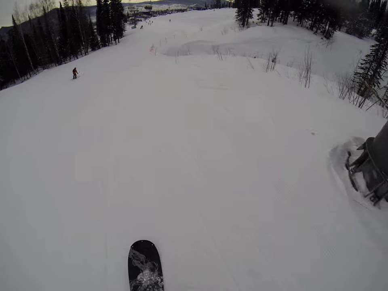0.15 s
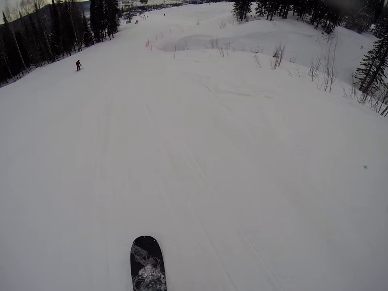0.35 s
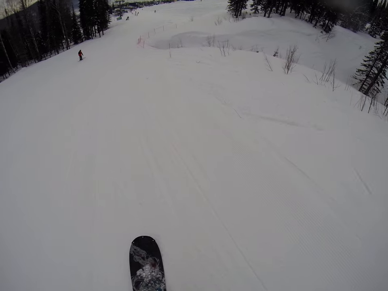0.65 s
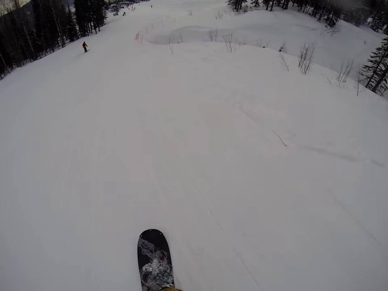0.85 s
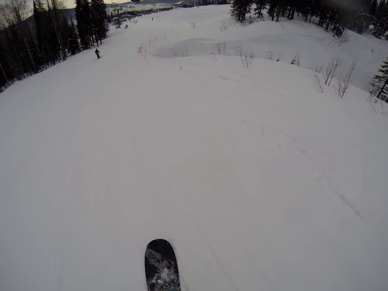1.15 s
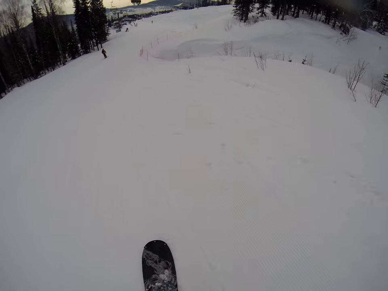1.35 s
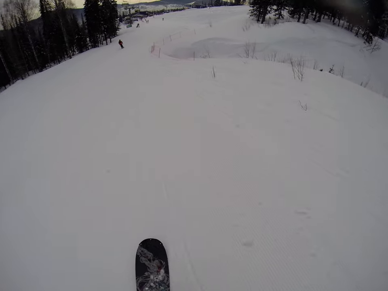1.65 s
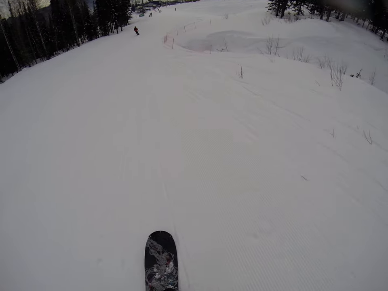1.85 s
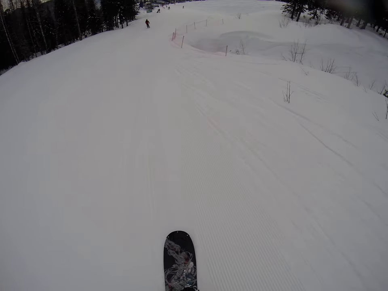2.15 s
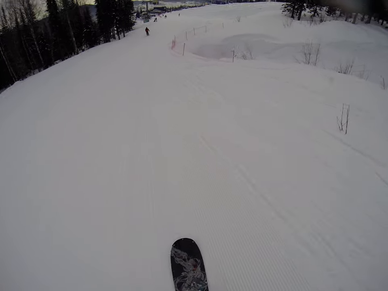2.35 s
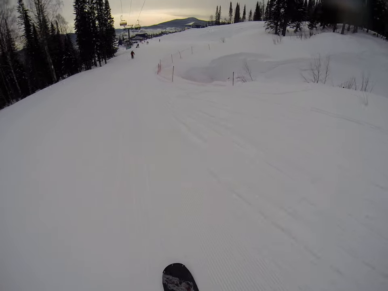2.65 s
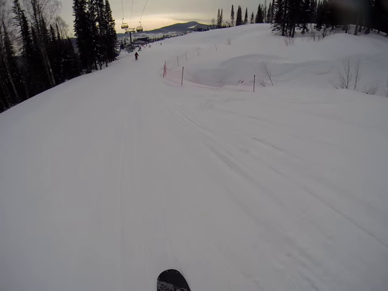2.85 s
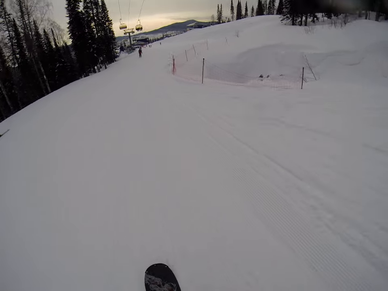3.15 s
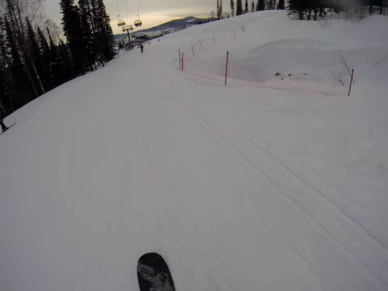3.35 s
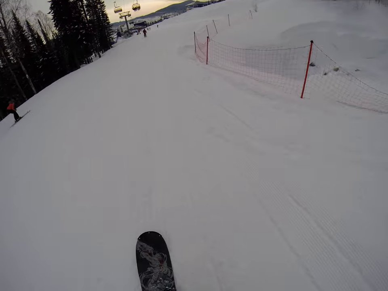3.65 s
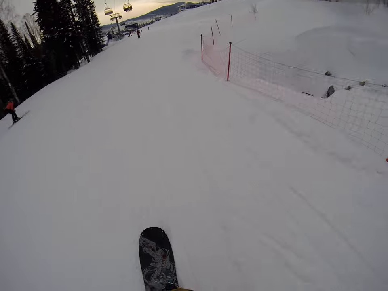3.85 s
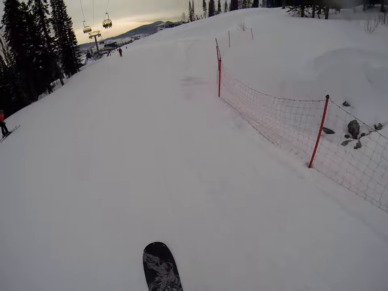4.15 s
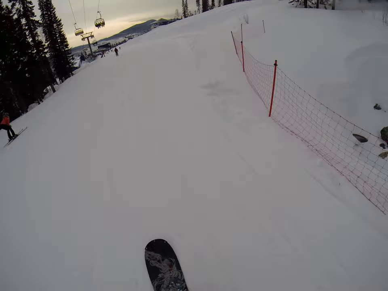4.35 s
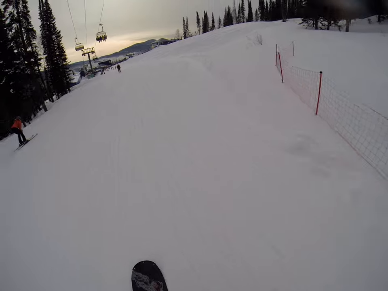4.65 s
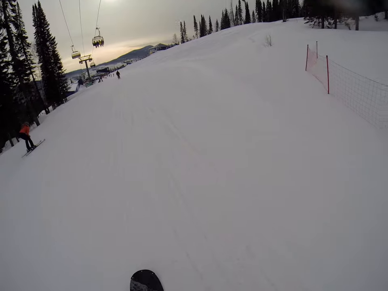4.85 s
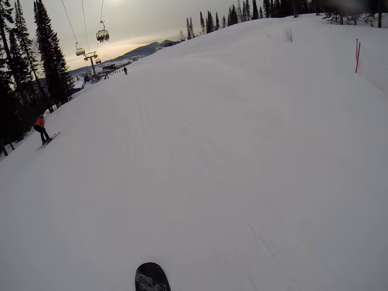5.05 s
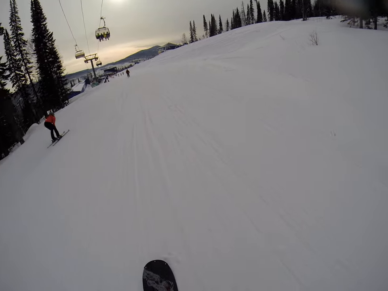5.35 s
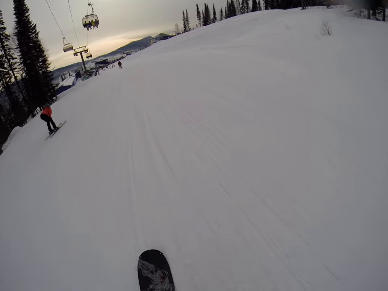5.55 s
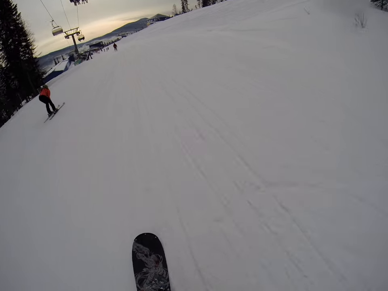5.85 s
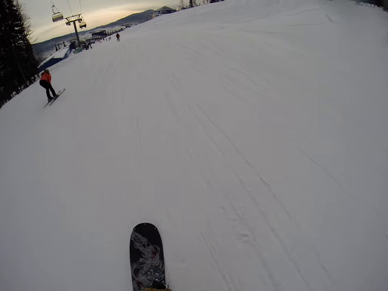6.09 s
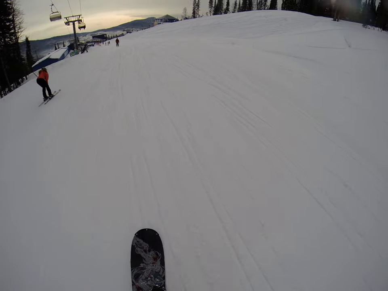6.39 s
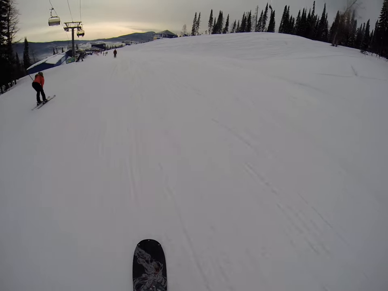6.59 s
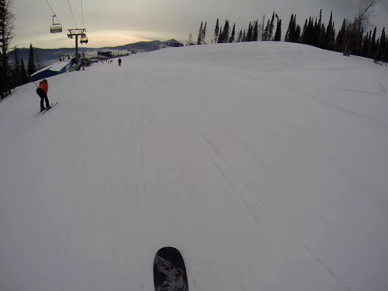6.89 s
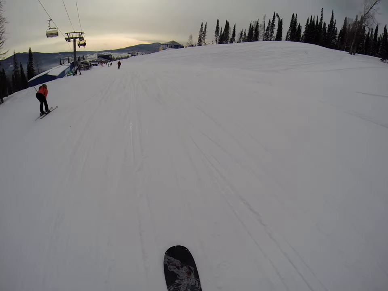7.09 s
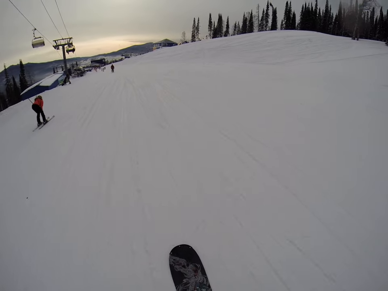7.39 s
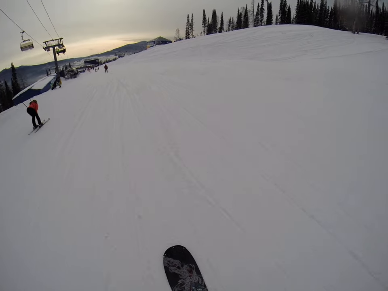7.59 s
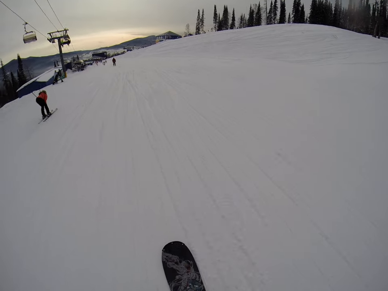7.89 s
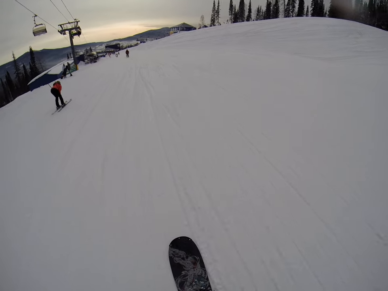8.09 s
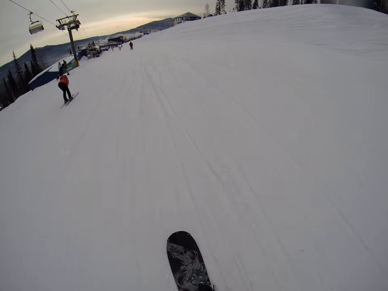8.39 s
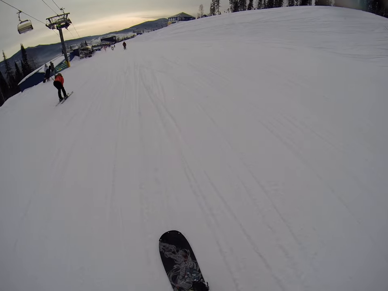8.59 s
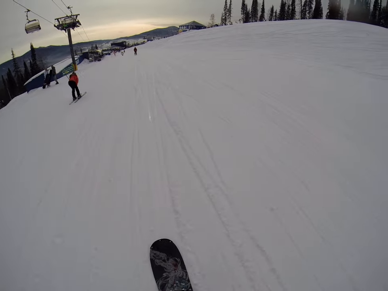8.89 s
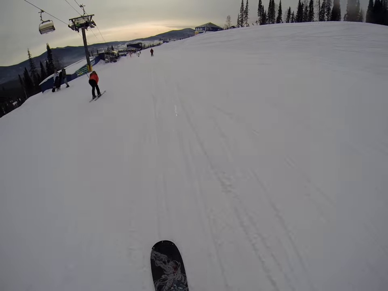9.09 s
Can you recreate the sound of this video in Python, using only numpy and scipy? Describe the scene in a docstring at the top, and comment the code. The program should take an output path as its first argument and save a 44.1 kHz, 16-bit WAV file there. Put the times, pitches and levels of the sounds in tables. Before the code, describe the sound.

A snowboard scrapes over groomed snow, faint at first, then loud with hollow knocks and rattles on the camera mount, finally thinning to soft hiss.

```python
"""A snowboard on groomed snow, heard from within: the microphone rides in a camera's closed, sprung housing.
At first a faint scrape, filtered noise coloured by the housing, with small squeaks and puffs of spray.
From 2.6 s it is loud; until 5.7 s bumps knock the mount's decaying modes into ringing, with loose rattles.
The scrape then dips, returns near 6.8 s and thins out from 7.9 s, with three last bumps after 8.4 s.
Throughout, random jolts shake the mount, shaped noise makes the air rush, and electronics hiss and whine."""
import sys
import numpy as np
from scipy import signal
from scipy.io import wavfile
from scipy.ndimage import uniform_filter1d

SR = 44100
rng = np.random.default_rng(int(sys.argv[2]) if len(sys.argv) > 2 else 0)


def output_pcm(signal):
    """Save a mono or channel-first signal as 16-bit PCM at the path in sys.argv[1].

    Samples are clipped to [-1, 1] before scaling.
    """
    pcm = np.clip(np.atleast_2d(signal).T, -1, 1) * 32767
    wavfile.write(sys.argv[1], SR, np.round(pcm).astype(np.int16))


N = 407043
FRAME, HOP = 1024, 256  # short-time spectra [samples]

# scrape of the board before flutter and grit: (time [s], level [dB])
SCRAPE_LEVEL = [(0, -52.5), (.45, -51.5), (.9, -45.5), (1.16, -50.5), (1.54, -38.5), (1.97, -44.5),
                (2.66, -33.5), (2.84, -28.5), (3.3, -29), (3.76, -34.5), (4.2, -35.5), (4.65, -33.5),
                (5.05, -30), (5.28, -31), (5.5, -31), (5.7, -32), (5.9, -37.5), (6.27, -42.5),
                (6.81, -35.5), (7.55, -35), (7.66, -34), (7.88, -39.5), (8.32, -43), (8.52, -50.5),
                (8.8, -45.5), (9.23, -44.5)]
# spectrum of crumbling snow: (frequency [Hz], relative level [dB per Hz])
SNOW_SPECTRUM = [(500, -34.5), (900, -18), (1200, -14), (2000, -13.5), (3300, -10), (3750, -9), (4000, -22),
                 (6000, -26.5), (7000, -34), (7900, -48), (8400, -47.5), (11000, -53.5), (12800, -57),
                 (14500, -77)]
# peaks and dips of the housing around the microphone: (frequency [Hz], width [Hz], gain [dB])
HOUSING_RESONANCES = [(1600, 278, 10.5), (2335, 730, 3), (2580, 86, -11.5), (2865, 450, 5),
                      (3802, 210, -8.5), (4870, 540, -8), (5700, 350, 2.5)]
# lowest housing peak, sliding as the camera turns: (time [s], frequency [Hz])
LOW_PEAK_PATH = [(0, 1379), (5.7, 1361), (6.3, 1297), (7.2, 1355), (9.23, 1303)]
LOW_PEAK_WIDTH_HZ, LOW_PEAK_DB = 258, 12.5
# tone balance: (time [s], scrape's lower mids [dB], scrape's treble at 4.3 kHz [dB],
# scrape's upper spray edge [dB], air's mids [dB])
TONE_BALANCE = [(0, 0.5, 7.5, -3, -2), (.7, 1, 6.5, -8, -4), (1.1, 1, 1, -6, -2.5), (1.5, -1.5, -2, -3, -2),
                (2.0, 1, 0.5, -4, -0.5), (2.4, 0.8, -0.5, -1, -6), (3.1, 0.5, 1.5, 6, -4),
                (3.7, -2.5, 2.5, -1, 4.5), (4.3, -1.5, 5, 7, 4.5), (5.05, -3, 3.5, 5.5, 4.5),
                (5.5, -1, 1.1, 0, 0.5), (5.9, -1.2, 3.5, 1, 3.5), (7.2, 1.1, -1, -2, -4),
                (7.75, -2, 2, -1, 3), (8.2, 0.9, 0.7, -3, 0.5), (8.7, -0.5, -4, -4, 0.5),
                (9.23, 3.5, -1.5, -4, -4)]
# swishes of loose snow: (time [s], length [s], level [dB])
SWISH_EVENTS = [(1.27, 0.12, -52.5), (1.5, 0.29, -55), (1.737, 0.22, -48.5), (6.7, 0.22, -51),
                (8.814, 0.17, -53)]
# spectrum of loose snow: (frequency [Hz], relative level [dB per Hz])
POWDER_SPECTRUM = [(3500, 8), (4300, 9.5), (5200, 0), (6500, 5), (7200, -19), (9500, -12), (12500, -30)]
# fuzzy squeaks of the edge: (time [s], length [s], start pitch [Hz], end pitch [Hz], level before throb [dB])
SQUEAK_EVENTS = [(1.31, 0.22, 1155, 1120, -49.5), (1.505, 0.2, 1550, 1600, -44),
                 (2.835, 0.11, 1375, 1450, -27.5), (3.515, 0.12, 1690, 1636, -35),
                 (3.853, 0.079, 1606, 1570, -31.5), (3.915, 0.038, 1455, 1392, -32.5),
                 (6.36, 0.203, 1164, 1217, -46.5), (6.551, 0.072, 1277, 1244, -37.5),
                 (6.818, 0.052, 1575, 1630, -38.5)]
# modes of the mount: (frequency [Hz], level when knocked [dB], level when shaken [dB], free t60 [s]); # the
# first is the sway; the second swings with both sway and knock in a bump
MOUNT_MODES = [(29.14, 5.5, 0.5, 0.35), (87.3, -12, -8.5, 0.8), (132, 6.5, -7.5, 0.025),
               (235.8, 1, -1, 0.16), (350, -29, -17.5, 0.093), (510.6, -18.5, -13.5, 0.14),
               (667.5, -26, -14, 0.12)]
# bumps: (time [s], knock [dB], sway [dB], dull thud against the knock [dB], share of the free ring time [ratio])
BUMP_EVENTS = [(2.62, -32.5, -36, 2, 0.38), (2.675, -28, -25, 7.5, 0.51), (2.795, -17.5, -14.5, -14, 0.56),
               (3.292, -22.5, -22, -20.5, 0.77), (3.457, -34, -11, -14, 0.54), (3.478, -12.5, -16, 1, 0.9),
               (3.517, -22.5, -29.5, -26, 0.94), (3.828, -23.5, -25, -16, 0.81),
               (3.869, -19, -14, -3, 0.31), (3.908, -5, -14, -7, 0.71), (4.287, -24.5, -41, -14, 0.52),
               (4.736, -24.5, -43, -17, 0.66), (4.746, -22.5, -23, -8, 0.6), (4.811, -21.5, -35, 0, 0.25),
               (4.951, -25, -15.5, -1, 0.55), (5.031, -27, -45, -1, 0.41), (5.064, -15.5, -16.5, -1, 0.75),
               (5.335, -19.5, -45, -3, 0.27), (5.427, -24, -47, -6, 0.3), (5.458, -24, -21, 4, 0.3),
               (5.591, -24, -26, -11, 0.39), (5.645, -26, -15, -3, 0.53), (5.665, -24.5, -60, 13, 0.43),
               (5.702, -24, -23.5, 3, 0.6), (8.455, -28.5, -52, -15, 0.89), (8.862, -31.5, -32, -7, 0.36),
               (8.981, -38.5, -24, -11, 0.62)]
RISE_MS, RISE_MS_PER_DB = 10.2, 0.5  # rise time constant [ms], and its change with thud [ms per dB]
CRACK_DB, CRACK_HZ, CRACK_T60 = -37.5, 600, 0.067  # crunch: base level [dB], low-pass [Hz], decay [s]
# stretches where the mount rattles loosely: (time [s], length [s], level [dB])
RATTLE_STRETCHES = [(3.383, 0.11, -31), (3.825, 0.078, -27), (4.72, 0.18, -39), (4.908, 0.12, -37),
                    (5.582, .05, -31.5)]
RATTLE_PER_S, RATTLE_SHARE = 140, 0.3  # mean jolts [per s]; share of the free ring time
# ice grains on the housing: (time [s], starting level [dB])
TICK_EVENTS = [(2.6733, -38), (4.9222, -44), (5.0494, -47)]
# ride: (time [s], slow sway of the mount [dB], fine shaking [dB], rush of air [dB])
RIDE_LEVELS = [(0, -41.5, -62, -53.5), (.6, -43, -58.5, -50.5), (1.05, -43.5, -52.5, -51),
               (2.1, -43.5, -50, -50), (3.1, -37, -42.5, -51.5), (3.6, -39.5, -42.5, -49),
               (4.1, -31.5, -44.5, -47), (4.6, -42, -45, -47.5), (5.15, -35, -44.5, -49),
               (5.7, -45, -45.5, -49.5), (6.2, -43, -45.5, -50), (6.7, -42.5, -47, -48),
               (7.7, -38, -48.5, -54), (8.2, -39.5, -57, -51), (9.23, -38.5, -54, -55.5)]
# spectrum of the air rush: (frequency [Hz], relative level [dB per Hz])
RUSH_SPECTRUM = [(40, 7), (100, 5), (300, 3), (450, -1), (700, -2.5), (1000, -2.5), (2000, -30),
                 (5000, -44)]
# spectrum of the electronic hiss: (frequency [Hz], relative level [dB per Hz])
HISS_SPECTRUM = [(3000, 14), (7000, 4), (9000, -3), (12000, -8.5), (13000, -8), (14300, -13), (15000, -7)]
HISS_DB = -61.5  # mean level
# thin electronic tones: (frequency [Hz], level [dB rms])
WHINE_TONES = [(9469, -88), (11838, -77)]
EDGE_HZ = 15300  # upper band limit of the microphone signal


def gain_of(db):
    """Decibels to gain."""
    return 10 ** (np.asarray(db) / 20)


def evened(x):
    """Scales to rms 1."""
    return x / np.sqrt(np.mean(x ** 2) + 1e-20)


def read(points, hz):
    """Reads a spectrum on a log-frequency axis."""
    f, value = np.transpose(points)
    return np.interp(np.log(hz + 1), np.log(f + 1), value)


def follow(rows, t):
    """Reads every column of a curve at the times t."""
    s, *columns = np.transpose(rows)
    return [np.interp(t, s, c) for c in columns]


def grid():
    """Frequencies (a column) and times of the short-time spectra."""
    hz = np.fft.rfftfreq(FRAME, 1 / SR)[:, None]
    return hz, np.arange(N // HOP + 5) * HOP / SR


def wander(top_hz, t):
    """Slow chance: sines of random phase, rms 1, over the two octaves below top_hz."""
    rates = np.geomspace(top_hz / 4, top_hz, num=30)
    return evened(sum(np.sin(2 * np.pi * (f * t + rng.random())) / np.sqrt(f) for f in rates))


def noise(shape_db, level_db):
    """Random short-time spectra, given a shape of overall rms 1 and a level for each frame."""
    a, b = rng.standard_normal((len(level_db), FRAME // 2 + 1, 2)).T
    white = a + 1j * b
    flat = signal.istft(white, nperseg=FRAME, noverlap=FRAME - HOP)[1]
    shape = evened(gain_of(shape_db))
    shaped = white * shape * gain_of(level_db)
    return signal.istft(shaped, nperseg=FRAME, noverlap=FRAME - HOP)[1][:N] / np.std(flat)


def ring(hz, t60, flat=0., settle=0.0071):
    """One decaying mode, pulled downward first; a loosened joint starts flat and settles up to pitch."""
    t = np.arange(SR) / SR
    turns = np.cumsum(hz * (1 - flat * np.exp(-t / settle))) / SR
    return -np.sin(2 * np.pi * turns) * gain_of(-60 * t / t60)


def burst(t, s, length):
    """A smooth rise and fall, 0-1, from s on."""
    return np.sin(np.pi * np.clip((t - s) / length, 0, 1))


def scrape():
    """Dense crumbling snow under the edge, patchy and gritty, coloured by the housing."""
    hz, t = grid()
    low_peak_hz = follow(LOW_PEAK_PATH, t)[0]
    peaks = list(HOUSING_RESONANCES) + [(low_peak_hz, LOW_PEAK_WIDTH_HZ, LOW_PEAK_DB)]
    housing_db = sum(db / (1 + (2 * (hz - f) / width) ** 2) for f, width, db in peaks)
    colour_db = read(SNOW_SPECTRUM, hz) + housing_db

    patches = rng.standard_normal((len(t), len(hz))).T
    patches = uniform_filter1d(patches, size=14, axis=0)  # smooth over frequency, then over time
    patches = evened(uniform_filter1d(patches, size=8, axis=1))

    low_db, treble_db, spray_db, _ = follow(TONE_BALANCE, t)
    low_share = np.interp(hz, [1700, 2100], [1, 0])
    treble_share = np.interp(hz, [3700, 4300, 9000], [0, 1, 1.8])
    spray_share = 1 / (1 + ((hz - 7600) / 650) ** 4)
    balance_db = low_share * low_db + treble_share * treble_db + spray_share * spray_db

    # ridges in the snow make the whole scrape flutter, the treble most
    flutter_db = np.interp(hz, [1000, 8000], [.9, 1.3]) * wander(24, t) + 0.56 * wander(9.3, t)
    lively_db = balance_db + 0.74 * patches + flutter_db
    grit = evened(uniform_filter1d(rng.standard_normal(N), size=60))
    return noise(colour_db + lively_db, follow(SCRAPE_LEVEL, t)[0]) * gain_of(0.73 * grit)


def swishes():
    """Loose snow sprays up in brief bright puffs of shaped noise."""
    hz, t = grid()
    power = sum((gain_of(db) * burst(t, s, length)) ** 2 for s, length, db in SWISH_EVENTS)
    return noise(read(POWDER_SPECTRUM, hz), 10 * np.log10(power + 1e-12))


def squeaks():
    """The edge sticks and slips: a tone that wobbles in pitch and strength."""
    out = np.zeros(N)
    for s, length, start_hz, end_hz, db in SQUEAK_EVENTS:
        t = np.arange(round(length * SR)) / SR
        wobble, throb = (evened(uniform_filter1d(rng.standard_normal(SR), size=500))[:len(t)]
                         for _ in range(2))
        hz = np.linspace(start_hz, end_hz, len(t)) * (1 + 0.016 * wobble)
        tone = np.sin(2 * np.pi * np.cumsum(hz) / SR)
        out[round(s * SR):][:len(t)] += tone * gain_of(db + 2 * throb) * burst(t, 0, length) ** .5
    return out


def bumps():
    """Each bump swings the mount, thuds, crunches, and leaves its modes ringing."""
    out, t = np.zeros(N + 2 * SR), np.arange(SR) / SR
    u = t / 0.0021  # the thud peaks after 2.1 ms
    thud = -u ** 2 * np.exp(2 - 2 * u)
    swing_in = 1 - np.exp(-t / 0.023)  # the heavy modes take a moment to get going
    soft = signal.butter(2, CRACK_HZ, fs=SR)
    for s, knock_db, sway_db, thud_db, share in BUMP_EVENTS:
        crunch = evened(signal.lfilter(*soft, rng.standard_normal(SR)))
        crunch = crunch * gain_of(CRACK_DB - 60 * t / CRACK_T60)
        crisp_db = 0.69 * (knock_db - thud_db)  # heavier thuds crunch less for the same knock
        sound = gain_of(knock_db + thud_db) * thud + gain_of(crisp_db) * crunch

        flat = np.clip(0.52 + 0.0098 * knock_db, 0, 1)  # harder knocks loosen the joint more
        rise_ms = max(RISE_MS + RISE_MS_PER_DB * thud_db, .2)  # a duller blow rises more slowly
        rise = 1 - np.exp(-1000 * t / rise_ms)
        swell = 1 - np.exp(-t / (0.018 * flat ** 2 + 0.0011))  # a looser joint builds its ring more slowly
        for k, (hz, db, _, t60) in enumerate(MOUNT_MODES):
            if k < 2:
                # the second mode needs both swing and knock
                drive_db = sway_db if k == 0 else (sway_db + knock_db) / 2
                detune = 1 + 0.093 * (k == 0) * rng.uniform(-1, 1)
                rung = swing_in * ring(hz * detune, t60 * (0.29 + share))
            else:
                # a slow blow barely drives the high modes
                drive_db = knock_db - .7 * rise_ms * (k > 3)
                onset = swell if k == 3 else rise  # only the fourth mode swells and starts flat
                rung = onset * ring(hz, t60 * max(share, .05), flat * (k == 3))
            sound = sound + gain_of(db + drive_db) * rung
        out[round(s * SR):][:SR] += sound
    return out[:N]


def rattles():
    """Uneven runs of small jolts, either way, each ringing the mount briefly."""
    t = np.arange(N) / SR
    when, size, way = rng.random((N, 3)).T
    jolts = (when < RATTLE_PER_S / SR) * np.sign(way - .5) * (0.57 + size)
    strength = sum(gain_of(db) * burst(t, s, length) ** .5 for s, length, db in RATTLE_STRETCHES)
    # the two lowest modes stay out of the rattle; no t60 is shorter than 50 ms
    body = sum(gain_of(db) * ring(hz, max(t60 * RATTLE_SHARE, .05)) for hz, db, _, t60 in MOUNT_MODES[2:])
    onset = 1 - np.exp(-t[:SR] / 0.0038)
    return signal.oaconvolve(jolts * strength, body * onset)[:N]


def ticks():
    """Ice grains strike the housing: tiny bright noise clicks that fall 60 dB in 8.4 ms."""
    out, t = np.zeros(N), np.arange(SR // 100) / SR
    bright = signal.butter(4, 8800, "highpass", fs=SR)
    for s, db in TICK_EVENTS:
        click = signal.lfilter(*bright, rng.standard_normal(len(t))) * gain_of(db - 60 * t / 0.0084)
        out[round(s * SR):][:len(t)] += click
    return out


def shaking():
    """The ride feeds every mode of the mount with random jolts that come in clumps."""
    t = np.arange(N) / SR
    sway_db, shake_db, _ = follow(RIDE_LEVELS, t)
    lumps, clumps = (np.interp(t, t[::HOP], wander(hz, t[::HOP])) for hz in (14, 30))
    out = np.zeros(N)
    for k, (hz, _, db, t60) in enumerate(MOUNT_MODES):
        clumping_db = 1.2 * lumps if k < 2 else 2.16 * clumps
        jolts = rng.standard_normal(N) * gain_of(clumping_db)
        rung = signal.oaconvolve(jolts, ring(hz, 0.8 * t60))[:N]  # shaken modes ring for 0.8 of their free time
        out += gain_of(db + (sway_db if k == 0 else shake_db)) * evened(rung)
    return out


def rush():
    """Lumpy air noise around the housing."""
    hz, t = grid()
    mids_db = np.interp(hz, [430, 600], [0, 1]) * follow(TONE_BALANCE, t)[3]  # full from 600 Hz up
    level_db = follow(RIDE_LEVELS, t)[2] + 1.4 * wander(12, t)
    return noise(read(RUSH_SPECTRUM, hz) + mids_db, level_db)


def electronics():
    """Slightly wavering hiss, weak below 2.5 kHz, and thin steady sine tones."""
    hz, frames = grid()
    t = np.arange(N) / SR
    tones = sum(np.sqrt(2) * gain_of(db) * np.sin(2 * np.pi * (f * t + rng.random()))
                for f, db in WHINE_TONES)
    hiss_shape_db = read(HISS_SPECTRUM, hz) - 40 * (hz < 2500)
    return noise(hiss_shape_db, HISS_DB + 0.73 * wander(9.2, frames)) + tones


def scene():
    """All sources at the one microphone."""
    snow = scrape() + swishes() + squeaks()
    knocks = bumps() + rattles() + ticks()
    background = shaking() + rush() + electronics()
    return (snow + knocks + background)[None]


def record(dry):
    """The microphone softly squashes the hardest swings; then the band limit."""
    squashed = .7 * np.tanh(dry / .7)
    band_limit = signal.firwin(1023, EDGE_HZ, window=("kaiser", 10), fs=SR)
    return signal.oaconvolve(squashed, band_limit[None], "same")


dry = scene()
out = record(dry)
output_pcm(out)
```